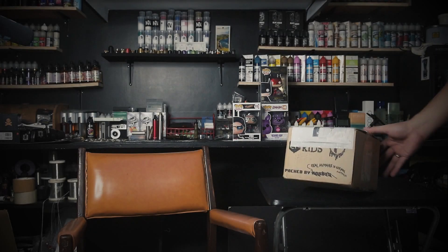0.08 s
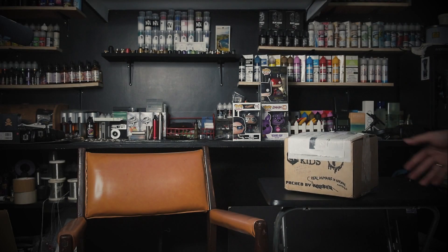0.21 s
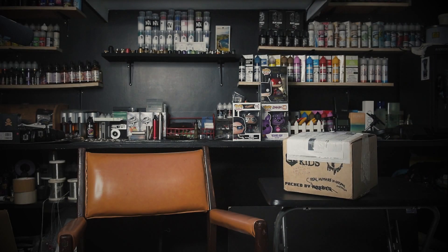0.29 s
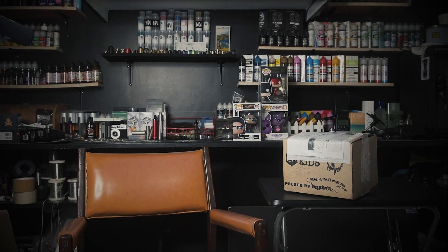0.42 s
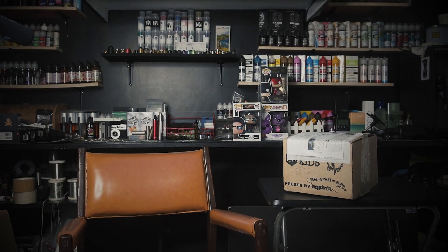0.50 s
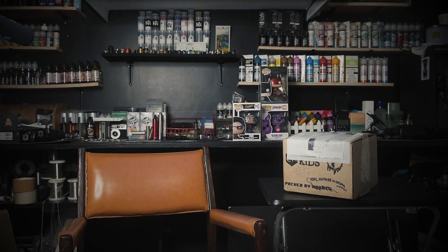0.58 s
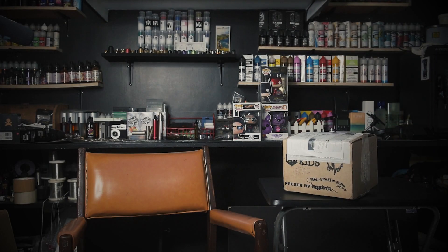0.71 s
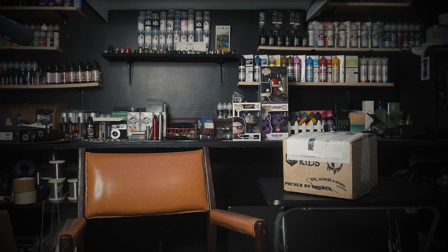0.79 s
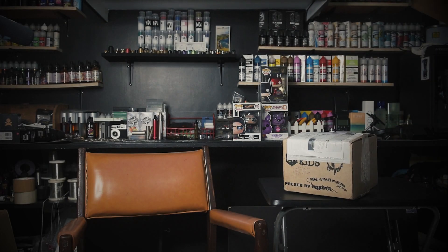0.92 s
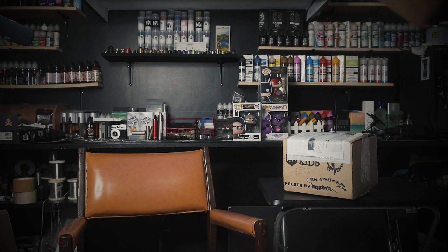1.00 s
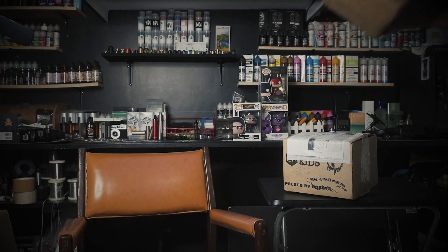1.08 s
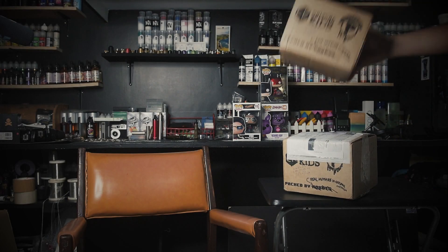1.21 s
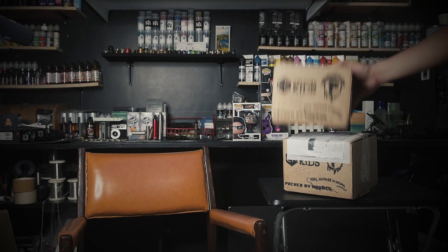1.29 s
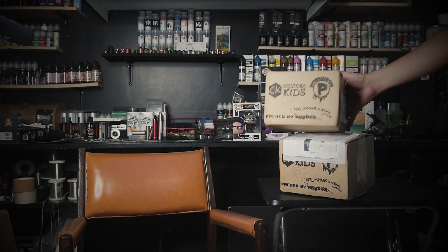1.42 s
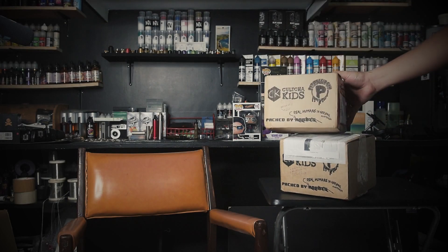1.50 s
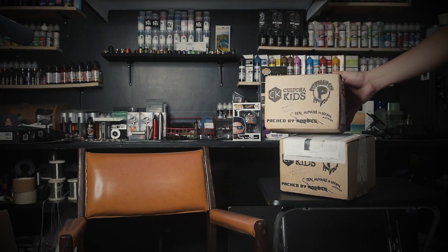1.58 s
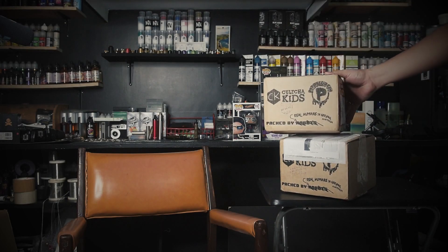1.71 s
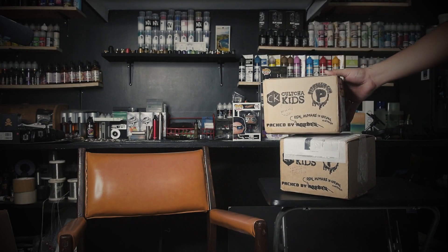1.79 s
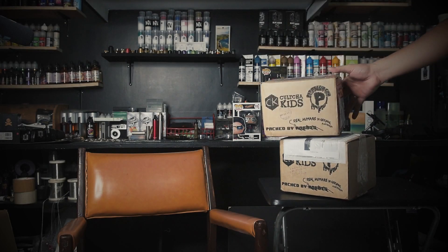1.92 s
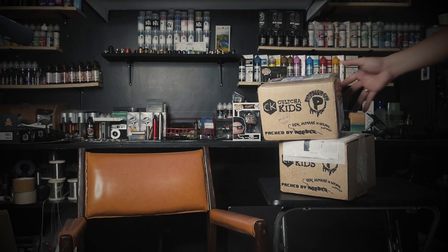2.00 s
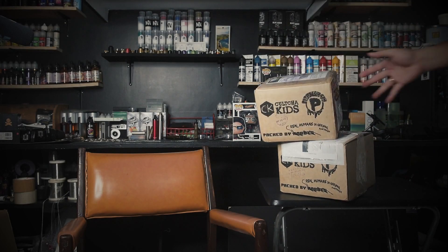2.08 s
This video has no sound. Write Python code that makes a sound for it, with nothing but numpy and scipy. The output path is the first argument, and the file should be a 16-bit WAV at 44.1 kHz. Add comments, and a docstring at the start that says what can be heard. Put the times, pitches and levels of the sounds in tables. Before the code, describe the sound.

Two cardboard boxes thud down one after the other, with light handling, over faint room hum

```python
"""A faint mains hum and the rush of a fan run throughout, with light taps and brushes of hands
on cardboard before, between and after the landings.
A box drops on a desk in a small room, and a second one is set on top of it: each lands edge first, then
flat, with a dull hollow thud and a crunch of corrugation, and rocks to rest. Thuds are decaying panel sines,
a board slap and noise; handling, crunch and fan are coloured noise; the hum is a set of sines.
The room adds standing waves and a diffuse tail at a close pair of microphones."""
import sys
import numpy as np
from scipy import signal
from scipy.fft import rfft, irfft
from scipy.io import wavfile

SR = 44100
rng = np.random.default_rng(int(sys.argv[2]) if len(sys.argv) > 2 else 0)


def wav_record(signal):
    """Record a signal, one row per channel, as 16-bit PCM in the file named by sys.argv[1]."""
    frames = np.transpose(np.atleast_2d(signal))
    bounded = np.clip(frames, -1, 1)
    # unit amplitude maps onto the largest positive 16-bit level
    quanta = np.round(bounded * 32767).astype(np.int16)
    wavfile.write(sys.argv[1], SR, quanta)


N = 92610
T = np.arange(N) / SR
HZ = np.maximum(np.fft.rfftfreq(2 * N, 1 / SR), 1)
CUTOFF_HZ = 13700  # top of the room tail and of the finished sound


def from_db(db):
    """Decibels to gain."""
    return 10 ** (np.asarray(db) / 20)


def at_hz(points, hz):
    """Read a table on a log-frequency axis."""
    f, v = np.transpose(points)
    return np.interp(np.log(hz), np.log(f), v)


def colour(x, spectrum):
    """Causal (minimum-phase) filter with the given gain in dB, built by folding the cepstrum."""
    cepstrum = irfft(np.log(from_db(at_hz(spectrum, HZ))))
    cepstrum[1:N] *= 2
    cepstrum[N + 1:] = 0
    response = np.exp(rfft(cepstrum))
    return irfft(rfft(x, 2 * N) * response)[..., :N]


def noise(spectrum, force=1):
    """Coloured noise whose rms follows the driving force; only the shape of the spectrum counts."""
    rms_gain = np.sqrt(np.mean(from_db(at_hz(spectrum, HZ)) ** 2))
    return colour(force * rng.standard_normal(N), spectrum) / rms_gain


def dying(t60):
    """Exponential decay by 60 dB in t60 seconds."""
    return np.exp(-np.log(1000) * T / max(t60, 1e-3))


def drift(rate):
    """Random wandering about zero, through `rate` new values a second joined by straight lines."""
    return np.interp(T * rate, np.arange(2048), rng.standard_normal(2048))


def add(out, s, x):
    """Mix x in from time s."""
    i = int(np.clip(s * SR, 0, N - 1))
    out[i:] += x[:N - i]


def stereo(mid, side):
    """Diffuse sound at a closely spaced pair of microphones."""
    # how wide the pair hears it: f/Hz, side minus mid level/dB
    width = [(40, 6), (130, -22), (400, -22.5), (1000, -23), (3000, -16), (8000, -12)]
    return mid + colour(side, width) * np.array([[1], [-1]])


def hum():
    """Mains hum and tones that waver in level, two of them close enough to beat."""
    # mains and fan tones: f/Hz, level/dB rms before the waver
    hum_tones = [(180.4, -65.5), (291.5, -68.5), (300.3, -66), (420, -82), (540, -75.5), (759, -79.5),
                 (877, -73.5), (933, -76), (1577, -78)]
    mains_hz, mains_db, mains_side_db = 59.7, -68.5, -31  # side is relative to mid
    waver_at_400_hz_db, wavers_per_s = 1.57, 12
    turn = 2 * np.pi * mains_hz * T
    side = from_db(mains_side_db) * np.cos(turn) * np.array([[1], [-1]])
    total = np.sqrt(2) * from_db(mains_db) * (np.sin(turn) + side)
    for hz, db in hum_tones:
        # higher tones waver more, up to twice as much
        waver = waver_at_400_hz_db * drift(wavers_per_s) * min(hz / 400, 2)
        tone = np.sin(2 * np.pi * (hz * T + rng.random()))
        total = total + np.sqrt(2) * from_db(db + waver) * tone
    return total


def fan():
    """The steady rush of a fan: coloured noise, independent in mid and side."""
    # spectrum of the rush: f/Hz, relative level/dB per Hz
    rush = [(25, -44), (60, -17.5), (110, -15), (200, -1), (300, -2), (400, 2), (600, -0.5), (900, -3),
            (1400, -4.5), (2000, -14.5), (3200, -18.5), (5000, -29), (6500, -31.5), (8200, -51.5),
            (14000, -66)]
    return from_db(-62.5) * stereo(noise(rush), noise(rush))


def room_tail():
    """Diffuse mid and side tail: bands of noise that build up, then each die at their own rate."""
    # reverberation: f/Hz, t60/s
    room_t60 = [(100, 0.98), (250, 0.45), (600, 0.42), (1200, 0.31), (3000, 0.37), (6000, 0.46),
                (12000, 0.044)]
    # colour of the tail: f/Hz, relative level/dB
    room_colour = [(60, -5), (150, 28.5), (300, -7.5), (700, -8), (1500, -5), (3000, -4), (6000, -8.5),
                   (12000, -5)]
    diffuse_from_hz, build_s, tail_db = 265.7, .011, -2
    size = SR * 3 // 4
    tail = np.zeros((2, N))
    edges = np.geomspace(diffuse_from_hz, CUTOFF_HZ, 21)
    build = 1 - np.exp(-(T / build_s) ** 2)
    for low, high in zip(edges, edges[1:]):
        band_pass = signal.butter(2, [low, high], "band", fs=SR, output="sos")
        band = signal.sosfilt(band_pass, rng.standard_normal((2, size)))
        fade = dying(at_hz(room_t60, np.sqrt(low * high))) * build
        band = band * fade[:size]
        energy = np.sum(band ** 2, axis=1, keepdims=True)
        tail[:, :size] += band * np.sqrt(2 * (high - low) / SR / energy)
    return from_db(tail_db) * colour(tail, room_colour)


def room(x):
    """Standing waves in the bass, quick scatter from nearby things and a tail that dies band by band."""
    # standing waves: f/Hz, level/dB at resonance, t60/s
    room_modes = [(125, -7, .45), (209, 6, .36), (252, -3, .28), (349, -5, .26), (432, -9, .22)]
    scatter_db, scatter_t60_s = -2, .015
    mid, side = room_tail()
    scatter = rng.standard_normal(N) * dying(scatter_t60_s)
    scatter = from_db(scatter_db) * scatter / np.linalg.norm(scatter)
    response = stereo(mid, side + scatter)
    standing = np.zeros(N)
    for hz, db, t60 in room_modes:
        q = np.pi * hz * t60 / np.log(1000)
        standing += from_db(db) * signal.lfilter(*signal.iirpeak(hz, q, fs=SR), x)
    return standing + signal.fftconvolve(response, x[None], axes=1)[:, :N]


def friction(strokes, spectrum, grain_db, grains_per_s):
    """Grainy rubbing that swells and fades with each stroke."""
    force = np.zeros(N)
    for s, length, db in strokes:
        force += from_db(db) * np.sin(np.pi * np.clip((T - s) / length, 0, 1))
    grain = from_db(grain_db * drift(grains_per_s))
    return noise(spectrum, force * grain)


def brushes():
    """Hands slide over cardboard: soft, fine-grained friction."""
    # strokes of the hands: t/s, length/s, level/dB before the grain
    brush_strokes = [(0.104, 0.13, -70.5), (0.525, 0.083, -65), (.78, .16, -66), (.92, .1, -70.5),
                     (1.124, 0.095, -75.5), (1.495, 0.16, -56), (1.848, 0.056, -67.5)]
    # spectrum of the brushing: f/Hz, relative level/dB per Hz
    brush_spectrum = [(60, -48), (200, -17), (800, 6), (2400, 4.5), (3500, -2), (6000, -11), (8000, -31),
                      (14000, -61)]
    return friction(brush_strokes, brush_spectrum, grain_db=2.0, grains_per_s=510)


def taps():
    """Fingers, flaps and contents touch lightly: a dull knock with a papery tick on top."""
    # touches: t/s, knock level/dB, tick level/dB
    touches = [(0.105, -49.5, -66.5), (0.132, -58.5, -63), (0.371, -46.5, -55), (.381, -52, -56.5),
               (0.402, -49, -62), (0.473, -83, -61.5), (0.553, -73, -58), (.567, -80, -71),
               (0.735, -49, -66), (.783, -56.5, -77), (0.796, -56, -63), (0.963, -51, -70),
               (1.148, -55.5, -67), (1.238, -85, -64.5), (1.66, -48, -66), (1.67, -49, -61),
               (1.743, -55.5, -56.5), (1.862, -54.5, -58.5)]
    # spectrum of the knock: f/Hz, relative level/dB per Hz
    knock_spectrum = [(100, -50), (300, -2), (600, 6), (1100, 7.5), (1700, -7.5), (4000, -23.5),
                      (12000, -59)]
    # spectrum of the tick: f/Hz, relative level/dB per Hz
    tick_spectrum = [(200, -30), (1200, 3), (2400, 6.5), (4000, 3), (6000, -4), (8000, -18), (14000, -78)]
    knock_attack_s, knock_t60_s, tick_t60_s = .0015, 0.064, 0.054
    knocks, ticks = np.zeros((2, N))
    knock_fade = (1 - np.exp(-T / knock_attack_s)) * dying(knock_t60_s)
    tick_fade = dying(tick_t60_s)
    for s, knock_db, tick_db in touches:
        add(knocks, s, from_db(knock_db) * knock_fade)
        add(ticks, s, from_db(tick_db) * tick_fade)
    return noise(knock_spectrum, knocks) + noise(tick_spectrum, ticks)


def skids():
    """Short skids make a panel honk: friction noise peaking around one pitch."""
    # skids: t/s, length/s, level/dB before the grain
    skid_strokes = [(.735, 0.027, -56), (1.657, 0.021, -44)]
    # spectrum of the honk: f/Hz, relative level/dB per Hz
    skid_spectrum = [(100, -41), (500, -8.5), (900, -7), (1150, 5), (1400, -4.5), (1800, -17), (4000, -23),
                     (9000, -56)]
    return friction(skid_strokes, skid_spectrum, grain_db=3.0, grains_per_s=300)


def scrapes():
    """The boxes shuffle into place with a coarse scrape: strongly grained friction."""
    # scrapes: t/s, length/s, level/dB before the grain
    scrape_strokes = [(.215, 0.063, -46.5), (.352, 0.043, -58.5), (1.555, 0.092, -47.5),
                      (1.63, 0.071, -55.5)]
    # spectrum of the scraping: f/Hz, relative level/dB per Hz
    scrape_spectrum = [(60, -33), (200, -1.5), (600, 2), (1200, 0), (1800, -0.5), (2600, -0.5), (4500, -16),
                       (6500, -15.5), (9500, -31), (11500, -68)]
    return friction(scrape_strokes, scrape_spectrum, grain_db=5.5, grains_per_s=400)


def crunches():
    """Flutes and tape give way: a snap, then a dying run of uneven crackles."""
    # crunches of corrugation and tape: t/s, relative level/dB, t60/s
    crunch_times = [(0.2039, -21, 0.017), (0.212, -39, 0.054), (0.228, -36, 0.033), (.256, -44, 0.037),
                    (.274, -42.5, 0.032), (.2915, -43.5, 0.013), (1.273, -52.5, 0.014),
                    (1.5335, -32.5, 0.044), (1.5404, -28.5, .033), (1.562, -53, .04), (1.594, -45, 0.042),
                    (1.6015, -35.5, 0.034)]
    # colour of the crackles: f/Hz, gain/dB
    crunch_spectrum = [(200, -33), (1000, -9), (2400, 6), (4000, -0.5), (5800, -3), (7000, -17),
                       (9500, -22), (11000, -35), (13000, -51)]
    crackles_per_s, crackle_spread_db = 5000, 2.5
    force = np.zeros(N)
    for s, db, t60 in crunch_times:
        add(force, s, from_db(db) * dying(t60))
    sizes = from_db(crackle_spread_db * np.minimum(rng.exponential(1, N), 3))
    happens = rng.random(N) < crackles_per_s / SR
    cracks = sizes * rng.choice([-1, 1], N) * happens
    return colour(force * cracks / np.std(cracks), crunch_spectrum)


def box(hits, modes, board, modes_db, board_db, board_t60, slap_db):
    """Each contact slaps the board, rattles its dense modes and sets the panels ringing."""
    rattle_from_hz, low_cut_hz = 593, 160  # above the first, the board's modes crowd together
    out = np.zeros(N)
    ring = np.zeros(N)
    for k, (hz, db, t60) in enumerate(modes):
        sign = (-1) ** k  # neighbouring modes start in opposite directions
        ring += sign * from_db(db + modes_db) * np.sin(2 * np.pi * hz * T) * dying(t60)
    slap = colour(1. * (T == 0), board)
    slap = from_db(slap_db) * slap / np.abs(slap).max()
    crowded = signal.butter(2, rattle_from_hz, "high", fs=SR)
    for s, db, soft_hz in hits:
        rattle = from_db(board_db) * signal.lfilter(*crowded, noise(board, dying(board_t60)))
        blow = ring - slap + rattle
        # a soft contact dulls the blow
        softness = signal.butter(1, min(soft_hz, .45 * SR), fs=SR)
        add(out, s, from_db(db) * signal.lfilter(*softness, blow))
    return signal.lfilter(*signal.butter(2, low_cut_hz, "high", fs=SR), out)


def upper_box():
    """The second box is set on the first: cardboard strikes cardboard and rocks to rest."""
    # contacts on the lower box: t/s, relative level/dB, softness as low-pass f/Hz
    upper_hits = [(1.5307, -22.5, 1100), (1.532, -16.5, 910), (1.5378, -20.5, 1900), (1.549, -27, 1600),
                  (1.56, -34.5, 1720), (1.572, -32.5, 2200), (1.583, -38, 1300), (1.602, -39, 3500),
                  (1.614, -37.5, 1210), (1.623, -38.5, 1200), (1.667, -48.5, 2400)]
    # panel and air modes: f/Hz, relative level/dB, t60/s
    upper_modes = [(141.4, -16, 0.041), (210.8, -16, 0.24), (233, -8.5, 0.052), (326.6, -11, 0.12),
                   (413, -22, 0.056), (503, -17, 0.18), (544, -35, 0.056), (630.5, -1.5, 0.069),
                   (753, -16.5, 0.12), (836, -14, 0.11), (970, -20, .22), (1020, -13, .15),
                   (1188, -4.5, 0.09), (1278, -9, 0.12)]
    # crowd of short-lived board modes: f/Hz, relative level/dB per Hz
    upper_board = [(47, -64), (80, -23.5), (345, 0.5), (1100, -8.5), (1280, -10), (1690, -20),
                   (3290, -20.5), (5740, -26.5), (6390, -41), (10000, -31.5), (11700, -70), (13600, -106)]
    return box(upper_hits, upper_modes, upper_board,
               modes_db=-5, board_db=-0.5, board_t60=0.041, slap_db=5.5)


def lower_box():
    """The first box drops on the desk, edge first and then flat, and rocks to rest."""
    # contacts on the desk: t/s, relative level/dB, softness as low-pass f/Hz
    lower_hits = [(.2027, -21.5, 8000), (.2042, -15.5, 4570), (.2144, -17.5, 1310), (.2286, -27.5, 2800),
                  (.2492, -31, 1200), (.2677, -35, 3020), (.2761, -31, 800), (.284, -28.5, 394),
                  (.378, -44, 1380)]
    # panel and air modes: f/Hz, relative level/dB, t60/s
    lower_modes = [(215.5, -9.5, 0.13), (319, -3, .16), (394, -3, 0.11), (519, -15, 0.24), (575, -15.5, .2),
                   (648.6, -14.5, 0.25), (728, -12.5, 0.081), (800, -15, 0.071), (929, -12, 0.11),
                   (1001, -7.5, 0.12), (1058, -26, 0.29), (1160, -19, 0.065), (1308, -13, 0.13),
                   (1496, -27, .13)]
    # crowd of short-lived board modes: f/Hz, relative level/dB per Hz
    lower_board = [(47, -50), (80, -15), (156, -8), (345, -5.5), (615, -5), (763, -4), (1010, -6.5),
                   (1920, -19.5), (2230, -22), (3740, -23), (4540, -32.5), (10500, -48.5), (13600, -51)]
    return box(lower_hits, lower_modes, lower_board,
               modes_db=-7.5, board_db=0.5, board_t60=0.06, slap_db=3.5)


def scene():
    """Two boxes and the handling noises in the room, over hum and fan, all a little to the right."""
    handling = brushes() + taps() + skids() + scrapes()
    close = handling + crunches() + upper_box() + lower_box()
    pan_db = [[-.25], [.25]]  # left, right
    return (close + room(close) + hum() + fan()) * from_db(pan_db)


def record(dry):
    """The top is cut steeply."""
    steep = signal.ellip(10, .1, 80, CUTOFF_HZ, fs=SR, output="sos")
    return signal.sosfilt(steep, dry)


dry = scene()
out = record(dry)
wav_record(out)
```